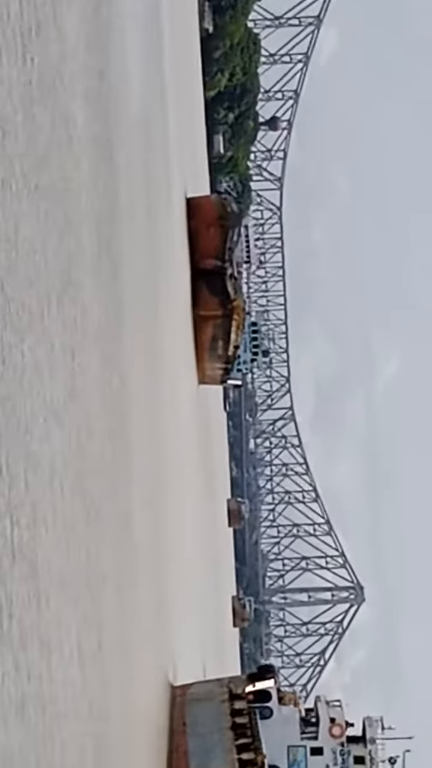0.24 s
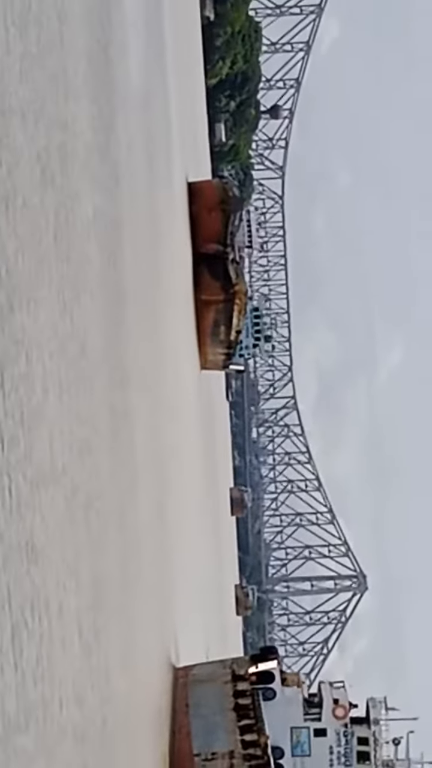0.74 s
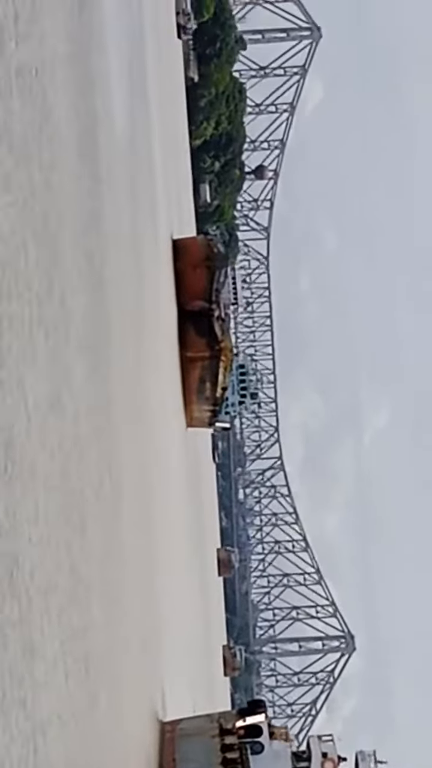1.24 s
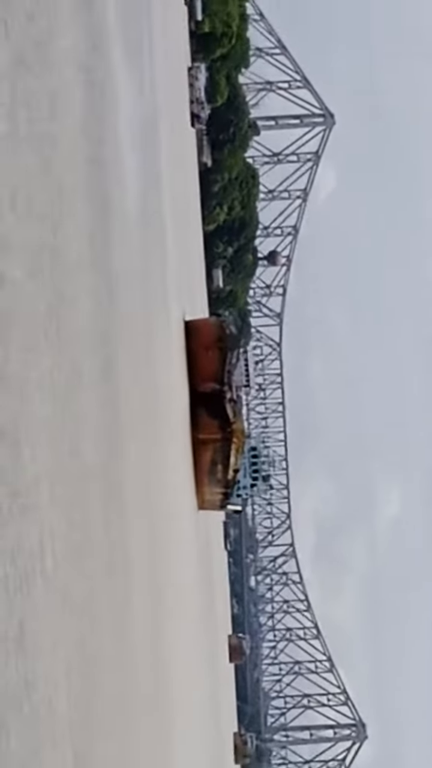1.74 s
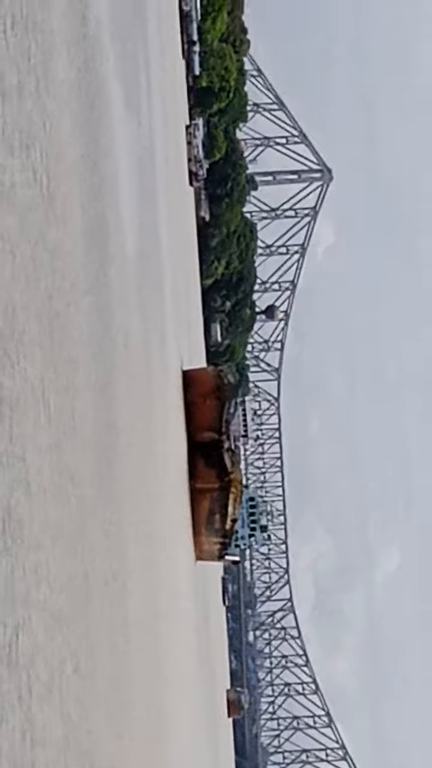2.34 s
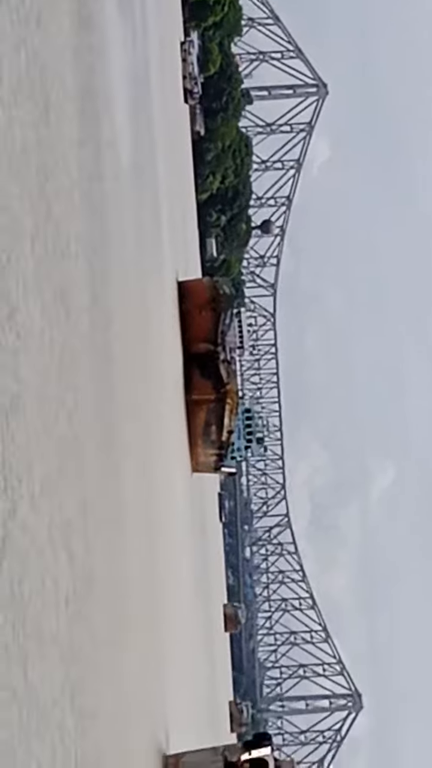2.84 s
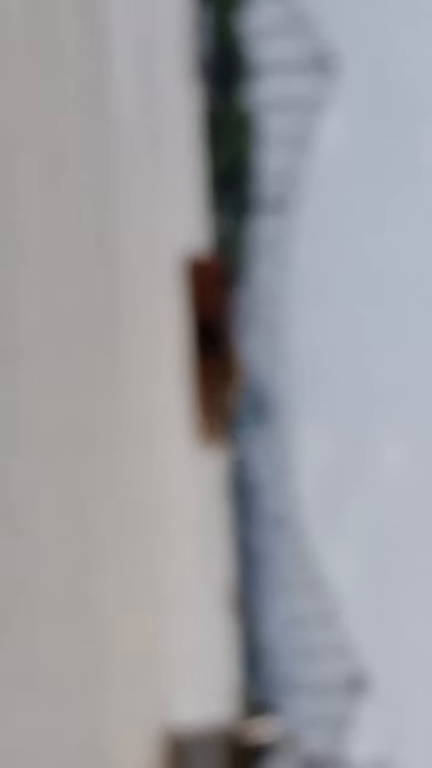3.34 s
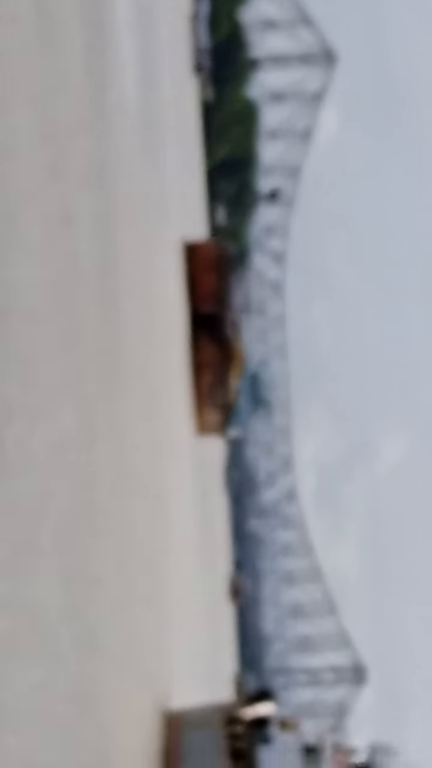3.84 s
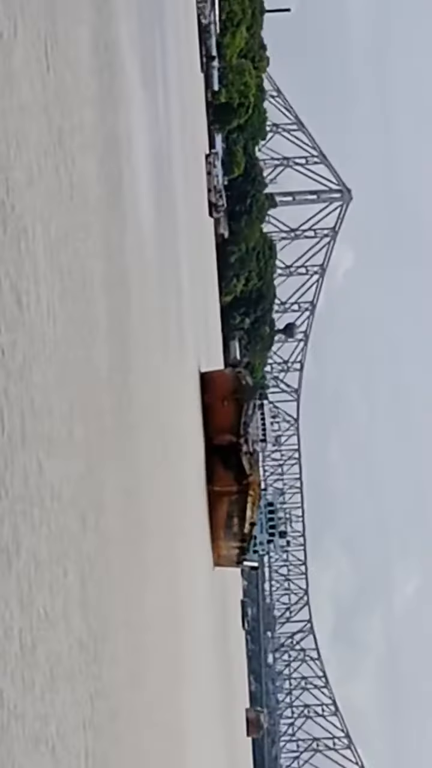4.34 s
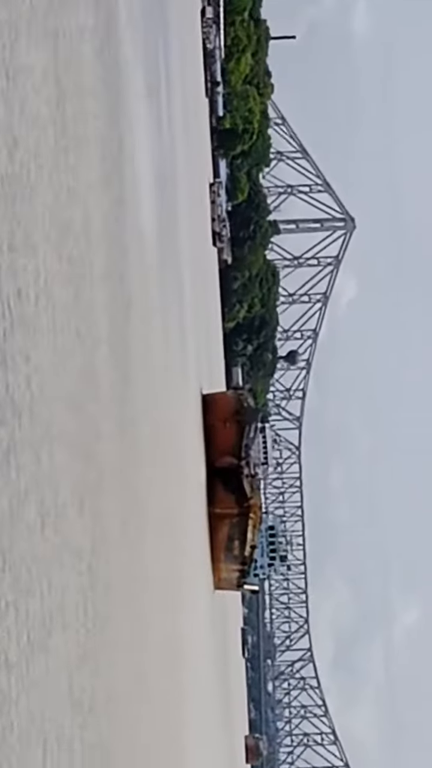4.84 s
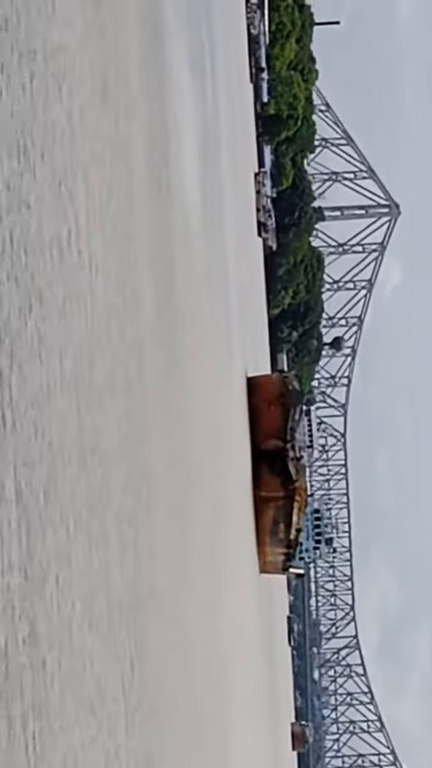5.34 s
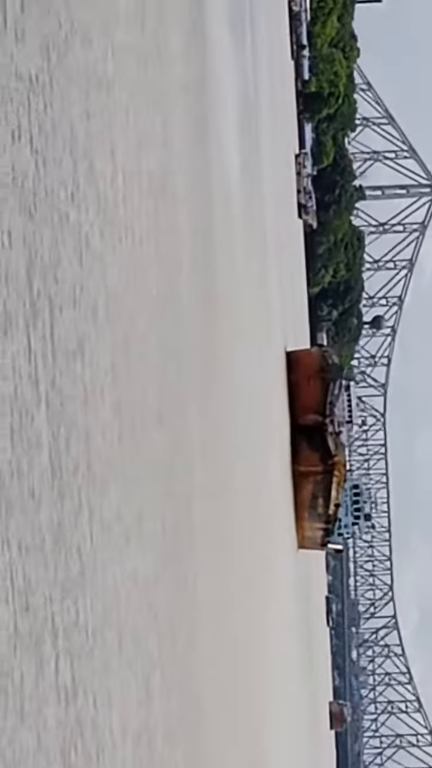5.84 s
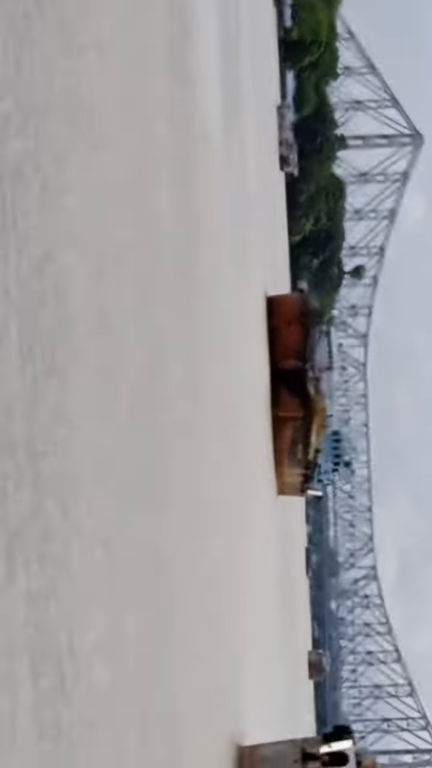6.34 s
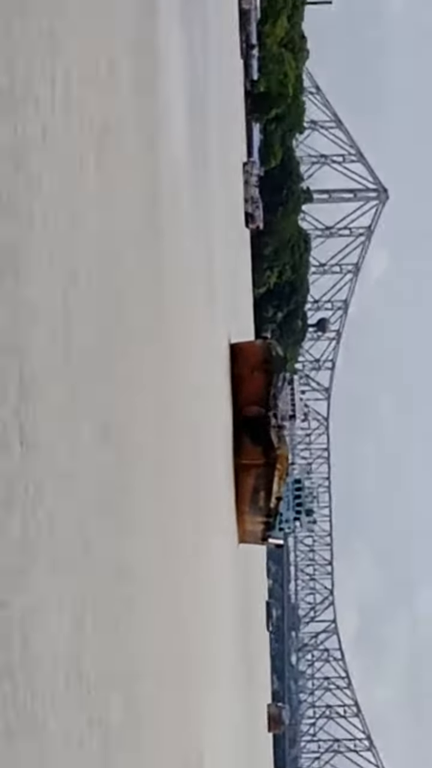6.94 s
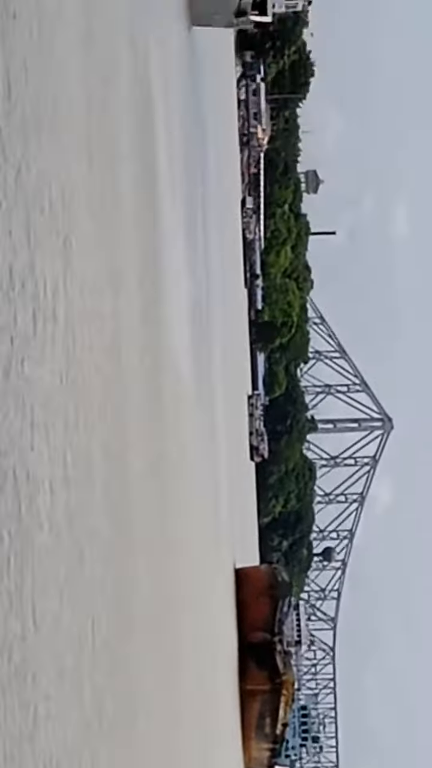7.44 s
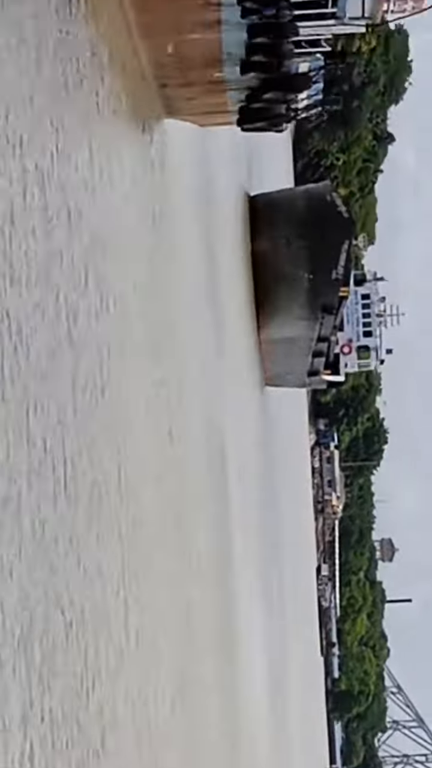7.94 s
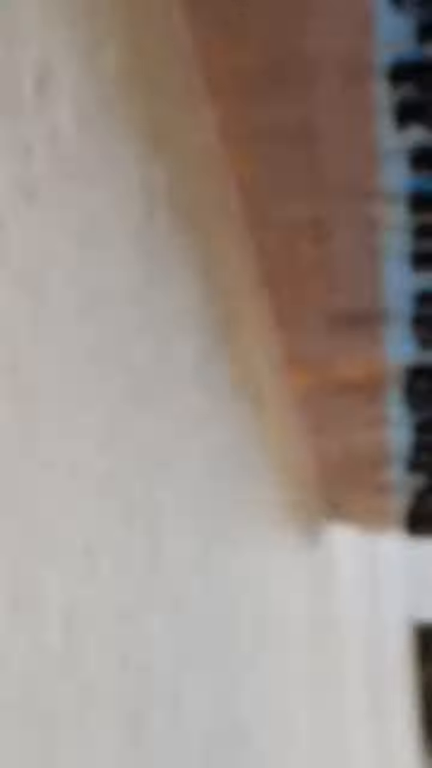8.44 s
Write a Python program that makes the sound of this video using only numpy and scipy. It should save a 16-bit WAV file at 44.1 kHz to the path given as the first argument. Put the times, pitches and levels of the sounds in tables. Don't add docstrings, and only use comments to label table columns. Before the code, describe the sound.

Aboard a river ferry, a diesel engine idles steadily below deck. Its deep, slightly lumpy exhaust boom runs under grainy metallic clatter, with two harder valve knocks in each of about six cycles per second. Hull thumps and low water rumble fill the bottom. Thin short cries squeak far off, and fingers crackle on the microphone early on. Near five seconds the microphone turns and the rattle changes tone.

```python
import sys
import numpy as np
from scipy import signal
from scipy.fft import rfft, irfft
from scipy.io import wavfile

SR = 44100
rng = np.random.default_rng(int(sys.argv[2]) if len(sys.argv) > 2 else 0)


def put_to_file(sound):
    columns = np.atleast_2d(sound).T
    safe = np.clip(columns, -1, 1)
    whole_steps = np.round(safe * 32767)
    wavfile.write(sys.argv[1], SR, whole_steps.astype(np.int16))


def how_loud(loudness_db):
    steps = np.asarray(loudness_db, float) / 20
    return 10 ** steps


N = 383229
CYCLE_HZ = 6.187
CYCLES = 62
STEP = 16
VOICE_EDGES_HZ = [1130, 4500]

# (time [s], turned [0-1])
TURN = [
    (0, 0.29),
    (4.8, 0.02),
    (5.2, 1),
    (8.69, 0.82),
]


def at_hz(points, hz):
    points_hz, values = np.transpose(points)
    return np.interp(np.log(hz), np.log(points_hz), values)


def in_time(rows):
    return np.interp(np.arange(N) / SR, *np.transpose(rows))


def rms_one(x):
    return x / np.sqrt(np.mean(x ** 2) + 1e-20)


def band(x, low_hz, high_hz):
    return signal.sosfilt(signal.butter(2, [low_hz, high_hz], "band", fs=SR, output="sos"), x)


def ring(x, hz, width_hz):
    r = np.exp(-np.pi * width_hz / SR)
    w = 2 * np.pi * hz / SR
    return signal.lfilter([0, np.sin(w)], [1, -2 * r * np.cos(w), r * r], x)


def times_of(place):
    # (time [s], crank lead [ms])
    lead = [(0, -.3), (.7, .7), (1.7, -.75), (2.4, -.15), (3.2, -1.3), (3.9, -1.7), (4.5, -3), (5.9, -3.1),
            (6.3, -2.1), (7.5, -3.9), (8.3, -2.8), (8.69, -3)]
    steady_s = (np.arange(-7, CYCLES - 7) + place) / CYCLE_HZ
    return steady_s - np.interp(steady_s, *np.transpose(lead)) / 1000


def looped_clicks(table, spread_db):
    clicks = np.zeros(N + SR)
    for place, strength in table:
        at = np.round((times_of(place) + 1) * SR).astype(int)
        size = strength * how_loud(spread_db * rng.standard_normal(len(at)))
        inside = (at >= 0) & (at < N + SR)
        clicks[at[inside]] = size[inside]
    return clicks


def exhaust():
    cylinders = [(.920, .143), (.0955, .176), (.2554, .107), (.4253, .146), (.5947, .073), (.7573, .171)]
    # (frequency [Hz], width [Hz], signed share [1])
    pipe = [(99.2, 29.5, .747), (115.2, 5.4, .57), (119.35, 8.9, -1.421), (172.3, 15.4, .091)]
    # (time [s], level [dB])
    boom_db = [(0, -26), (4.2, -26.4), (5.8, -26), (8.1, -26.5), (8.69, -26)]
    pulses = looped_clicks(cylinders, spread_db=.5)
    boom = sum(share * ring(pulses, hz, width_hz) for hz, width_hz, share in pipe)
    boom = signal.sosfilt(signal.butter(2, 41.1, "high", fs=SR, output="sos"), boom)
    boom = signal.sosfiltfilt(signal.butter(2, 420, "low", fs=SR, output="sos"), boom)
    return how_loud(in_time(boom_db)) * rms_one(boom[SR:])


def hull():
    # (frequency [Hz], width [Hz], level [dB])
    modes = [(232, 25, -36), (256.8, 6.7, -41), (309.7, 9.26, -23), (372.4, 25, -31.5), (472, 13, -34.5)]
    # (place in cycle [0-1], level [dB])
    thumps = [(0.06, -26), (0.111, -22.5), (.47, -22), (.74, -30), (0.789, -24), (.885, -21.5)]
    blows = [(place, how_loud(db)) for place, db in thumps]
    out = np.zeros(N + SR)
    for hz, width_hz, db in modes:
        out += how_loud(db) * ring(looped_clicks(blows, spread_db=4.5), hz, width_hz)
    return out[SR:]


def rumble():
    # (frequency [Hz], density [dB per Hz])
    spectrum = [(4, -23), (12, -6.5), (25, -8.5), (60, -6), (95, 5), (120, -8.5), (150, -3.5), (200, -5.5),
                (310, -7.5), (450, -14), (600, -37.5)]
    hz = np.maximum(np.arange(N // 2 + 1) * SR / N, 1)
    gain = how_loud(at_hz([*spectrum, (2000, -65.0)], hz))
    return how_loud(-43) * rms_one(irfft(rfft(rng.standard_normal(N)) * gain, N))


def every_cycle(table, spread_db):
    rows = np.vstack([np.c_[times_of(place), np.tile(levels, (CYCLES, 1))] for place, *levels in table])
    rows[:, 1:] += spread_db * rng.standard_normal((len(rows), 3))
    return rows


def valve_knocks():
    # (place in cycle [0-1], block ring [dB], deck rattle [dB], tick [dB])
    valves = [
        (.243, -43.5, -53.5, -60),
        (.757, -46.5, -55, -68.5),
    ]
    # (ring [dB], rattle [dB], tick [dB])
    chance_db = (2.0, 1.6, 1.8)
    # (time [s], extra on deck [dB], extra in block [dB])
    odd_knocks = [(.201, 4.5, 5), (.286, -3, 8.5), (1.17, 2, 9.5), (1.418, 4.5, 6), (1.494, 0.5, -4),
                  (1.656, 2, -2), (1.903, 5, -11), (2.065, 4, -7), (2.14, 2.5, 3.5), (3.111, 3, 2),
                  (3.358, 6, 5), (3.519, -6, -8), (4.244, 2.5, 2), (4.405, 0, -4), (4.566, 4, -4),
                  (4.891, 0, 4), (5.054, 2, 4), (5.376, -6, 1.5), (5.785, -5, -9), (5.946, 4, -1),
                  (6.591, 4, 3), (6.754, -10, -3), (6.916, 3, 0.5), (7.076, 5.5, 1), (7.401, 4.5, 1),
                  (7.478, 2.5, -5), (7.639, 4.5, -3), (7.801, 4, 0), (7.886, 4, -8), (8.122, 4, 0)]
    turned_tick_db = 4
    rows = every_cycle(valves, np.array(chance_db))
    plain = every_cycle(valves, 0)
    for s, deck_db, block_db in odd_knocks:
        nearest = np.argmin(abs(rows[:, 0] - s))
        rows[nearest] = plain[nearest] + [0, block_db, deck_db, deck_db]
    second = len(rows) // 2
    rows[second:, 3] += turned_tick_db * np.interp(rows[second:, 0], *np.transpose(TURN))
    return rows


def knock_list():
    # (place in cycle [0-1], block ring [dB], deck rattle [dB], tick [dB])
    contacts = [(0.106, -45, -59, -70), (0.412, -52.5, -66.5, -68), (.455, -50.5, -60.5, -70.5),
                (0.599, -51.5, -60, -70.5), (0.912, -44, -57, -62.5), (0.976, -46, -59, -67.5)]
    rows = np.vstack([valve_knocks(), every_cycle(contacts, 1.6)])
    return rows[(rows[:, 0] > .003) & (rows[:, 0] < (N - STEP) / SR)]


def shaking(knocks, voice, hold_ms, fall_ms, spread_db, churn_db, lead_s):
    # (ring [dB], rattle [dB], tick [dB])
    between_db = (-46, -60.5, -69.5)
    chance = np.clip(rng.standard_normal(len(knocks)), -2, 1.4)
    level = how_loud(knocks[:, 1 + voice] + spread_db * chance)
    start_s = np.maximum(knocks[:, 0] - lead_s, 0)
    power = np.zeros(N // STEP + 1)
    np.add.at(power, (start_s * SR / STEP).astype(int), level ** 2)
    ms = np.arange(200) * STEP / SR * 1000
    shape = (1 - np.exp(-ms / 0.86)) * np.exp(-np.maximum(ms - hold_ms, 0) / fall_ms)
    power = np.convolve(power, shape)[:len(power)] + how_loud(between_db[voice] + churn_db) ** 2
    return np.interp(np.arange(N) / STEP, np.arange(len(power)), np.sqrt(power))


def clatter():
    # (frequency [Hz], density within voice [dB per Hz])
    facing = [(600, -5), (700, -2.5), (850, 4.5), (950, -3), (1100, -8), (1300, 5), (2200, 0), (3000, -8),
              (4200, -17.5), (4600, 1), (6000, 7.5), (7500, -5), (8100, -12.5), (11000, -18.5)]
    # (frequency [Hz], density within voice [dB per Hz])
    away = [(600, -4), (700, -7), (850, -3.5), (950, -2.5), (1100, -9), (1300, 6), (2300, -0.5),
            (2700, -1.5), (3200, -1), (4200, -16.5), (4600, 0.5), (6300, 5.5), (7500, -12.5), (9300, -11),
            (10300, -30)]
    # (frequency [Hz], gain [dB])
    capsule = [(11000, -1.5), (12300, 4.5), (13700, -2), (15000, 6.5), (16000, 5)]
    # (frequency [Hz], extra level [dB])
    churn = [(900, 0), (1200, 4.5), (1900, 3.5), (2400, 0), (8000, 0), (10000, 6), (16000, 10)]
    plate_hz = [684, 745, 831, 1324, 1704, 1972, 2185, 2327, 3100, 3400, 5080, 5593, 6079, 6765, 7560, 8300,
                1080, 1520, 2600, 2850, 3750, 4250, 7150]
    # (width [Hz], level before turn [dB], level after turn [dB])
    plates = [(38, -2, -1), (40.7, -4.5, -8), (51.7, -4, -3.5), (35.8, -7, -5), (51, -6.5, -13.5),
              (40, -11, -13), (59.4, -8.5, -10.5), (50.3, -17.5, -6.5), (90, -22.5, -6.5), (90, -21.5, -10),
              (80, -16.5, -16.5), (70, -8, -9.5), (110, -15.5, -4), (90, -11.5, -7.5), (50, -17.5, -20),
              (150, -27.5, -24), (50.3, -18.5, -17.5), (50, -13, -18), (50, -12, -14), (70, -19.5, -15.5),
              (70, -23.5, -19.5), (60, -23, -22.5), (80, -12, -12)]
    hold_ms, fall_ms, voice_db = (-2.5, 16.5, 16.0), (11.0, 11.0, 5.5), (-8.0, -3.0, -6.5)
    band_spread_db, plate_spread_db = (2.0, 3.0, 3.5), (3.0, 5.5, 6.5)
    voice_width_hz = (400, 2500, 3000)
    build_cycles = 6.0

    knocks, turned, out = knock_list(), in_time(TURN), np.zeros(N)
    grains = rng.standard_normal((2, N)) * how_loud(2.6 * rng.standard_normal((2, N)))
    grains = grains / grains.std()

    edges_hz = 450 * 2 ** (np.arange(32) / 6)
    for k, (low_hz, high_hz) in enumerate(zip(edges_hz, edges_hz[1:])):
        hz = np.sqrt(low_hz * high_hz)
        voice = np.searchsorted(VOICE_EDGES_HZ, hz)
        force = grains[k % 2] * shaking(knocks, voice, hold_ms[voice], fall_ms[voice], band_spread_db[voice],
                                        churn_db=at_hz(churn, hz), lead_s=build_cycles / hz)
        before_db = at_hz(facing, hz)
        colour_db = before_db + at_hz(capsule, hz) + turned * (at_hz(away, hz) - before_db)
        unit = np.sqrt(SR / 2 / voice_width_hz[voice])
        out += how_loud(colour_db + voice_db[voice]) * unit * band(force, low_hz, high_hz)

    for k, (hz, (width_hz, before_db, after_db)) in enumerate(zip(plate_hz, plates)):
        voice = np.searchsorted(VOICE_EDGES_HZ, hz)
        envelope = shaking(knocks, voice, .4 * hold_ms[voice], fall_ms[voice], plate_spread_db[voice],
                           churn_db=at_hz(churn, hz) - 9, lead_s=build_cycles / hz)
        force = grains[k % 2][::-1] * envelope
        unit = np.sqrt(4 * np.pi * width_hz / SR)
        plate = band(ring(force, hz, width_hz), hz / 1.1, hz * 1.1)
        out += how_loud(before_db + turned * (after_db - before_db)) * unit * plate

    skirt = signal.sosfilt(signal.butter(4, 9300, "high", fs=SR, output="sos"), out)
    return out - .5 * turned * skirt


def gusts():
    return np.interp(np.arange(N) / SR, np.arange(72) / 8, rng.standard_normal(72))


def top_hiss():
    facing_db, turned_db, sway_db = -84, -85, 2.0
    air_db = -13.5
    level_db = facing_db + in_time(TURN) * (turned_db - facing_db) + sway_db * gusts()
    white = rng.standard_normal(N)
    peak = rms_one(band(band(white, 14600, 16600), 14300, 16800))
    air = rms_one(band(white, 9500, 13500))
    return how_loud(level_db) * (peak + how_loud(air_db) * air)


def cries():
    # (start [s], length [s], from [Hz], to [Hz], level [dB])
    calls = [(0, 0.2, 606, 547, -49.5), (.285, .135, 1550, 1480, -54), (.67, 0.083, 597, 595, -52),
             (.875, .13, 1500, 1564, -52), (3.05, 0.054, 620, 600, -45), (4.86, 0.065, 1800, 1960, -58),
             (5.296, 0.048, 1870, 1830, -53), (5.543, 0.056, 1910, 1910, -59),
             (6.11, 0.057, 1176, 1216, -56), (6.124, 0.1, 1595, 1710, -53), (6.941, 0.09, 622, 580, -48),
             (.02, 0.037, 828, 715, -44.5), (4.02, 0.052, 838, 820, -38.5), (6.927, 0.071, 837, 702, -43.5)]
    out = np.zeros(N)
    for s, length_s, from_hz, to_hz, db in calls:
        size = round(length_s * SR)
        sway = rms_one(band(rng.standard_normal(9000), 15, 60))
        flutter = how_loud(2.0 * sway[-size:])
        tone = np.sin(2 * np.pi * np.cumsum(np.linspace(from_hz, to_hz, size)) / SR)
        out[round(s * SR):][:size] += how_loud(db) * np.sqrt(2 * np.hanning(size)) * flutter * tone
    return out


def crackles():
    # (time [s], length [ms], level at 2-8 kHz [dB], level above 10 kHz [dB])
    touches = [(.7205, 9, -42, -58), (.7285, 3.2, -36, -44), (.732, 10, -45, -54), (.738, 7.1, -44, -62),
               (0.76, 4.4, -42.5, -71), (.764, 18, -55, -80), (.5503, 1.3, -52, -75),
               (2.5762, 1.5, -71, -73), (2.9805, 1.3, -75, -62), (2.9865, 2.5, -70, -50),
               (2.9997, 2.5, -70, -59), (3.0098, 13, -74, -60), (3.048, 4, -74, -59),
               (3.1145, 3.3, -70, -63), (3.5307, 1.7, -81, -59), (4.2303, 4.4, -53, -65),
               (4.6843, 4.7, -52, -65)]
    mid, top = np.zeros(N), np.zeros(N)
    ms = np.arange(2000) / SR * 1000
    for s, length_ms, mid_db, top_db in touches:
        at = round(s * SR)
        fade = np.exp(-ms / length_ms)
        mid[at:at + len(ms)] += how_loud(mid_db) * fade
        top[at:at + len(ms)] += how_loud(top_db) * fade ** 1.5
    white = rng.standard_normal((2, N))
    dull = rms_one(band(white[0], 1300, 2940) + 0.64 * band(white[0], 5600, 7100))
    bright = rms_one(band(white[1], 14400, 16400) + 0.21 * band(white[1], 12000, 13000))
    return mid * dull + top * bright


def scene():
    engine = exhaust() + hull() + rumble() + clatter()
    return (engine + top_hiss() + cries() + crackles())[None, :]


def top_cut(x):
    return signal.sosfilt(signal.butter(12, 17080, fs=SR, output="sos"), x)


def record(dry):
    cut = signal.sosfilt(signal.ellip(12, .5, 45, 15740, fs=SR, output="sos"), dry)
    return top_cut(cut)


dry = scene()
out = record(dry)
put_to_file(out)
```